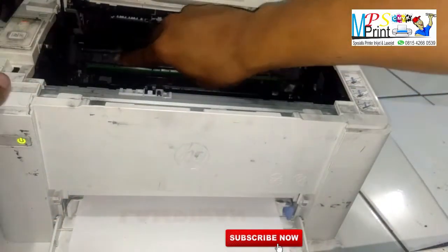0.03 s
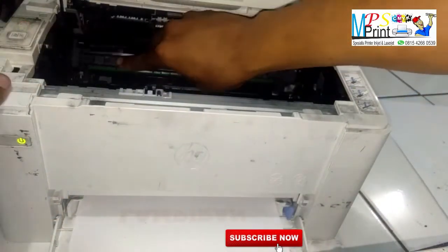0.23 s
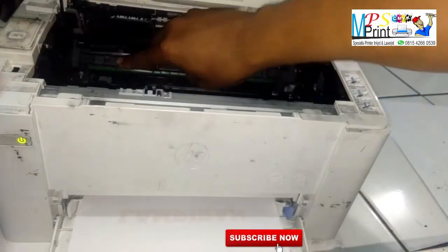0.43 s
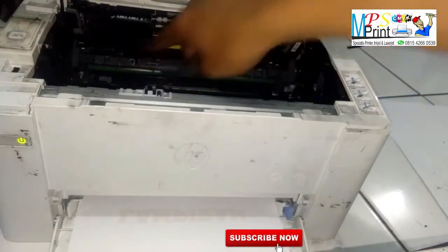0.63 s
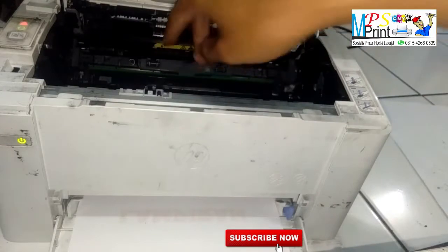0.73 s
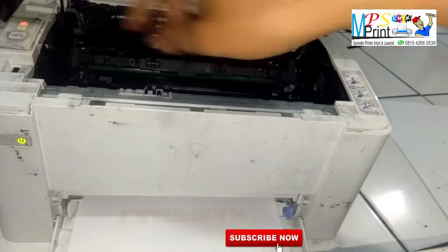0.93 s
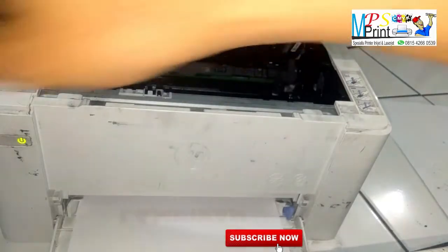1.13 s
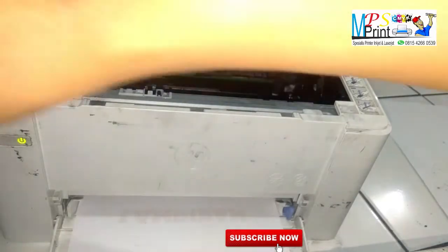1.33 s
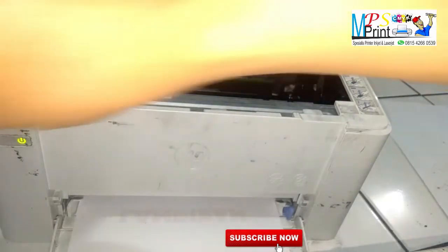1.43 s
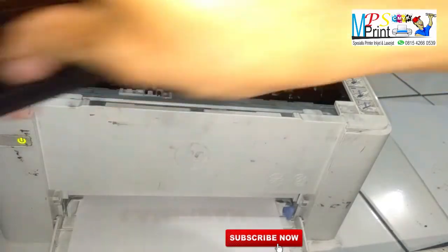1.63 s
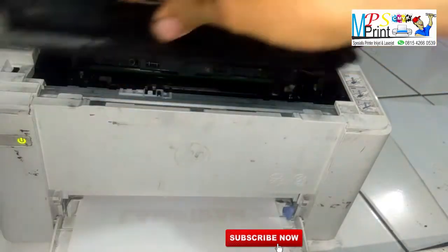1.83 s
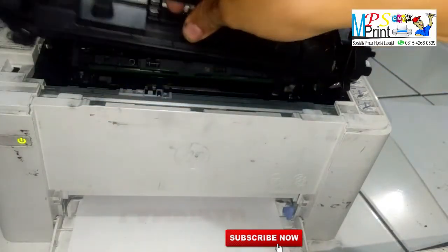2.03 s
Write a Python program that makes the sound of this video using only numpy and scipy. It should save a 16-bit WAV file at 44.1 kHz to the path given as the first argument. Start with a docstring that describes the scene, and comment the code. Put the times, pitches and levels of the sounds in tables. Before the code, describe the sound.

A printer cartridge unlatches with a loud clack, followed by a click and faint ticks.

```python
"""In a small tiled room, a hand unlatches the toner cartridge of an open laser printer.
The plastic lets go in one rattling clack, a train of impacts that excites the damped modes of latch,
cartridge and housing and rocks the printer on its feet. A sharp click, faint ticks and brief hisses
follow as the cartridge is lifted. Behind it an electrical appliance hums, with a throbbing mains buzz
and a thin whine over steady air noise."""
import sys
import numpy as np
from scipy import signal
from scipy.fft import rfft, irfft
from scipy.io import wavfile

SR = 44100
rng = np.random.default_rng(int(sys.argv[2]) if len(sys.argv) > 2 else 0)


def store_pcm(level_fs):
    """Save levels as 16-bit WAV."""
    pcm = np.round(np.clip(level_fs, -1, 1) * 32767).astype(np.int16)
    wavfile.write(sys.argv[1], SR, np.atleast_2d(pcm).T)


N = 92610
T = np.arange(N) / SR
HZ = np.fft.rfftfreq(N, 1 / SR)

# impacts of the clack: t/s, snap level/dB, knock level/dB
BLOWS = [(0.1415, -22, -38.5), (0.1484, -14.5, -35.5), (0.1561, -11, -25.5), (0.1601, -3.5, -19),
         (.166, -12, -25), (0.1777, -5.5, -18), (.1855, -8.5, -23.5), (0.192, -3.5, -26), (0.197, -12, -16),
         (0.203, -27, -23), (.222, -41.5, -23.5)]
# light contacts of plastic: t/s, level/dB, tilt/(dB per octave)
TICKS = [(0.1284, -37, 2), (0.302, -29, -1), (.381, -41, -6), (0.4574, -37, -0.5), (0.477, -35, 5),
         (.490, -36, -1.5), (0.5616, -36.5, -0.5), (0.6928, -40.5, -0.5), (1.491, -35, -2.5),
         (1.6148, -33.5, 0.5)]
# brief hisses: centre t/s, Gaussian width/s, level/dB, tilt/(dB per octave)
# the last is a faint high hiss trailing the tick at 1.61 s
HISSES = [(0.08, 0.018, -43, 1.5), (0.465, 0.016, -44, -6.5), (0.547, 0.01, -46.5, -2),
          (0.64, 0.0058, -46, 6), (0.951, 0.015, -52, -0.5), (1.63, 0.04, -57, 6)]
# spectra of the short noises: f/Hz, relative level/dB
SNAP_SPECTRUM = [(300, -53), (2000, -19), (4500, -12.5), (6300, -4), (7800, 1.5), (9600, 1), (11500, -11),
                 (14000, -18.5), (15300, -19.5)]
KNOCK_SPECTRUM = [(25, -54), (130, -32), (250, -3), (500, 3.5), (680, -12.5), (1000, -9.5), (1350, 6),
                  (1700, -0.5), (2700, -3), (3200, -8), (4200, -7), (9000, -44)]
CLICK_SPECTRUM = [(200, -23), (700, -22), (1100, -7), (2600, -2), (4500, -9.5), (6500, -6), (9000, -4.5),
                  (11500, -17), (15000, -20)]
TICK_SPECTRUM = [(100, -4), (350, 15.5), (800, -8.5), (1900, -1.5), (5500, 1.5), (9000, 6.5), (12000, -9.5),
                 (15000, -11)]
HISS_SPECTRUM = [(100, -41), (400, 1), (780, 1.5), (1100, 0), (3300, 0.5), (5000, -7), (8500, 6.5),
                 (12000, -12.5), (15000, -20)]
# normal modes of the struck parts: f/Hz, level/dB, T60/s
LATCH_MODES = [(3198, -16.5, 0.049)]
CARTRIDGE_MODES = [(262, -23.5, .1), (326, -26, .11), (484, -16.5, .14)]
HOUSING_MODES = [(360, -19.5, 0.15), (964, -32, 0.11), (1222, -25, 0.12), (1275, -19.5, 0.06),
                 (2148, -28, .15)]
ROCKING_MODES = [(93.7, -26.5, 0.22), (125.4, -15, 0.08), (155.7, -32, 0.26)]
CLICK_MODES = [(1280, -41, .07), (2665, -37, .05), (3177, -37, .06), (3338, -47, .22), (6051, -39, .06),
               (8576, -37, .06)]
BUMP_MODES = [(783, -41, .1)]
# partials of the hum: f/Hz, level/dB
HUM_PARTIALS = [(100, -57), (150, -54), (200, -62.5), (403, -57), (497, -63.5), (544, -62)]
# successive swells of hum and buzz: relative level/dB
SWELLS = [0, 0, 0, -1, 0, -2, 2, 2.5, 2.5, -1, 1.5]
# envelope of the whine: t/s, level/dB
WHINE_LEVELS = [(0, -64), (.42, -72), (.6, -61), (.97, -59), (1.1, -69), (1.3, -60), (1.56, -56),
                (1.72, -71), (1.78, -58), (1.97, -56), (2.1, -62)]
# spectra of the background noises: f/Hz, relative level/dB
BUZZ_SPECTRUM = [(30, -41.5), (200, -11), (420, 2), (560, -1), (660, -22.5), (1210, -18), (1300, 5.5),
                 (1400, 2), (1520, -3), (1700, -5.5), (2100, -16), (2600, -16), (9000, -48)]
FIZZ_SPECTRUM = [(3000, -37), (6500, -12), (8000, 3.5), (9300, 3.5), (11000, -11), (15000, -19)]
AIR_SPECTRUM = [(25, -22), (60, -7.5), (100, 0.5), (160, -2), (270, -5), (540, -6), (640, -17.5),
                (1000, -21), (2300, -19), (4600, -34), (6500, -28), (8500, -23.5), (11500, -39),
                (15000, -35.5)]
# reverberation time of the room: f/Hz, T60/s
ROOM_T60 = [(100, 0.18), (500, 0.42), (1500, 0.32), (4000, 0.32), (8500, 0.28), (15000, 0.23)]

ATTACK_S = .0013
MAINS_HZ, WHINE_HZ = 50, 7812
THROB_PERIOD_S, FIRST_PEAK_S, SWELL_DB_PER_S, SAG_DB_PER_S = .2, .123, 58, 262


def clack():
    """Impact excitation: the cartridge chatters past its latches; latch, cartridge and housing ring."""
    impacts = sum(amp(snap_db) * strike(start, t60=.032) * noise(SNAP_SPECTRUM)
                  + amp(knock_db) * strike(start, t60=.074) * noise(KNOCK_SPECTRUM)
                  for start, snap_db, knock_db in BLOWS)
    chatter = unit(amp(2.1 * drift(hz=690)))
    ringing = ring(.187, LATCH_MODES) + ring(.1595, CARTRIDGE_MODES) + ring(.196, HOUSING_MODES)
    return impacts * chatter + ringing


def thud():
    """Damped mass-spring oscillation: the printer rocks on its feet."""
    return ring(.203, ROCKING_MODES, rise=.014)


def click(start=.7482):
    """Transient response: a small hard part snaps back with a broadband crack and a brief ring."""
    envelope = strike(start, t60=.032)
    # the phases of a noise burst under a smooth magnitude spectrum
    phases = np.exp(1j * np.angle(rfft(envelope * rng.standard_normal(N))))
    crack = irfft(phases * amp(read(CLICK_SPECTRUM, HZ)), N) * (T > start)
    crack = unit(crack) * np.sqrt(np.mean(envelope ** 2))
    return amp(-24.5) * crack + ring(start, CLICK_MODES)


def handling():
    """Contact noise: ticks, knocks and brief grainy hisses as the cartridge is gripped and lifted."""
    ticks = sum(amp(db) * strike(start, t60=.017, rise=.0004) * noise(TICK_SPECTRUM, tilt)
                for start, db, tilt in TICKS)
    hisses = sum(amp(db) * np.exp(-((T - centre) / width) ** 2 / 2) * noise(HISS_SPECTRUM, tilt)
                 for centre, width, db, tilt in HISSES)
    hand_bump = ring(.455, BUMP_MODES, rise=.006)
    housing_knock = amp(-37.5) * strike(1.49, t60=.022) * noise(KNOCK_SPECTRUM, tilt_db=-2)
    grain = unit(amp(2 * drift(hz=290)))
    return ticks + hand_bump + housing_knock + hisses * grain


def appliance():
    """Amplitude modulation: hum, buzz and high fizz swell and sag five times a second."""
    hum = sum(amp(db) * unit(np.sin(2 * np.pi * hz * T + .45 * drift(hz=5)) * amp(2 * drift(hz=3)))
              for hz, db in HUM_PARTIALS)
    since_peak = (T - FIRST_PEAK_S) % THROB_PERIOD_S
    swell_db = np.interp(T, FIRST_PEAK_S + THROB_PERIOD_S * np.arange(len(SWELLS)), SWELLS)
    dip_db = np.minimum(SAG_DB_PER_S * since_peak, SWELL_DB_PER_S * (THROB_PERIOD_S - since_peak))
    throb = unit(amp(swell_db - dip_db))
    buzz = amp(-55) * mains_pulses(.018, BUZZ_SPECTRUM, decay_s=.005)
    fizz_phase = 2 * np.pi * (since_peak - .072) / THROB_PERIOD_S  # peaks 72 ms after the buzz
    fizz_db = -60 + 2 * np.cos(fizz_phase) + 2.4 * drift(hz=25)
    fizz = amp(fizz_db) * mains_pulses(.0185, FIZZ_SPECTRUM, decay_s=.016)
    return (hum + buzz) * throb + fizz


def mains_pulses(offset_s, spectrum, decay_s, rise_s=.0018):
    """Periodic excitation: one puff of noise per mains cycle drives the casing's resonances."""
    age = (T - offset_s) % (1 / MAINS_HZ)
    puffs = np.minimum(age / rise_s, 1) * np.exp(-age / decay_s)
    return resonate(puffs * rng.standard_normal(N), spectrum)


def whine():
    """Phase and amplitude modulation: the appliance's thin tone wavers, fades and returns."""
    level_db = np.interp(T, *np.transpose(WHINE_LEVELS))
    return amp(level_db) * unit(np.sin(2 * np.pi * WHINE_HZ * T + .33 * drift(hz=25)))


def air():
    """Stationary random noise: a steady rush of air, strongest in the bass."""
    return amp(-53) * noise(AIR_SPECTRUM)


def room(x, delay_s=.008):
    """Reverberation: dense reflections from hard walls decay exponentially, slowest near 500 Hz."""
    hz, t, spectra = signal.stft(rng.standard_normal(SR), SR, nperseg=256)
    decay = np.exp(-np.log(1000) * t / read(ROOM_T60, hz)[:, None])
    tail = signal.istft(spectra * decay, SR)[1][:SR] * (T[:SR] > delay_s)
    return signal.fftconvolve(x, tail / np.linalg.norm(tail))[:N]


def amp(db):
    """Amplitude ratio of a level in decibels."""
    return 10 ** (np.asarray(db) / 20)


def unit(x):
    """Normalisation to rms 1."""
    return x / np.sqrt(np.mean(x ** 2) + 1e-20)


def read(points, hz):
    """Interpolation of a table on a log-frequency axis."""
    f, value = np.transpose(points)
    return np.interp(np.log(hz + 1), np.log(f + 1), value)


def noise(spectrum, tilt_db=0):
    """Spectral shaping of white noise, tilted per octave above the table's second frequency."""
    level_db = read(spectrum, HZ) + tilt_db * np.log2(np.maximum(HZ, spectrum[1][0]))
    return unit(irfft(rfft(rng.standard_normal(N)) * amp(level_db), N))


def drift(hz):
    """Random fluctuation: low-pass noise of rms 1."""
    return unit(irfft(rfft(rng.standard_normal(N)) * np.exp(-(HZ / hz) ** 2), N))


def strike(start, t60, rise=ATTACK_S):
    """Impact envelope: linear rise and exponential decay, times in seconds."""
    age = np.maximum(T - start, 0)
    return np.minimum(age / rise, 1) * np.exp(-np.log(1000) * age / t60)


def ring(start, modes, rise=ATTACK_S):
    """Free vibration: a superposition of damped modes excited together."""
    return sum(amp(db) * strike(start, t60, rise) * np.sin(2 * np.pi * hz * (T - start))
               for hz, db, t60 in modes)


def resonate(x, spectrum):
    """Minimum-phase filtering: the sound rings on after each impulse."""
    log_gain = np.log(amp(read(spectrum, abs(np.fft.fftfreq(N, 1 / SR)))))
    response = np.exp(np.conj(signal.hilbert(log_gain)))[:len(HZ)]
    return unit(irfft(rfft(x) * response, N))


def scene():
    """Superposition of the printer's direct sound, its reverberation and the background."""
    release = clack()
    lifting = click() + handling()
    reverberation = room(amp(-10) * release + amp(-9.5) * lifting)
    return (release + thud() + lifting + reverberation + appliance() + whine() + air())[None]


def record(dry):
    """Soft saturation rounds the highest peaks; a low-pass filter limits the band."""
    low_pass = signal.firwin(301, cutoff=15550, window=("kaiser", 8), fs=SR)
    return signal.oaconvolve(np.tanh(dry), low_pass[None], "same")


dry = scene()
out = record(dry)
store_pcm(out)
```